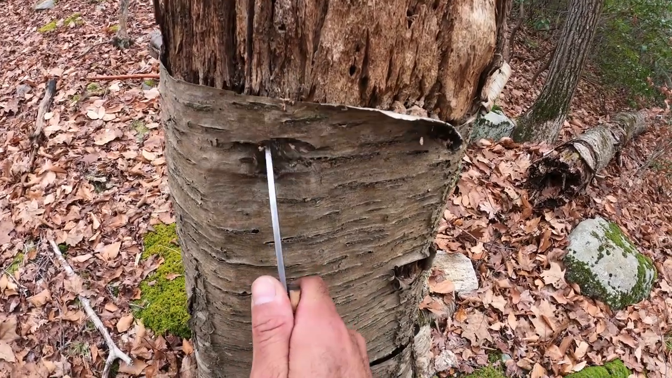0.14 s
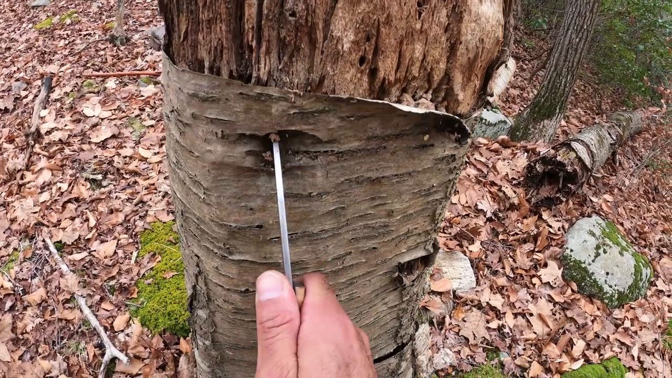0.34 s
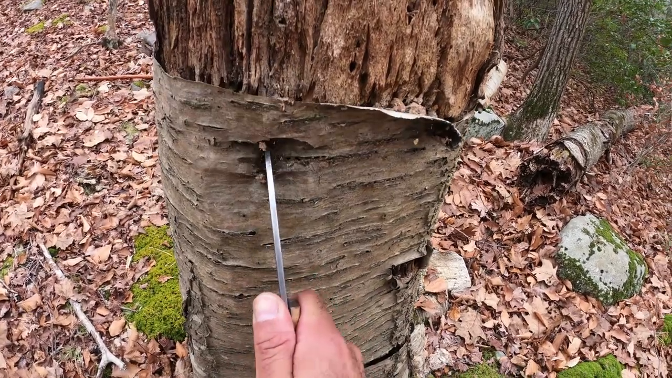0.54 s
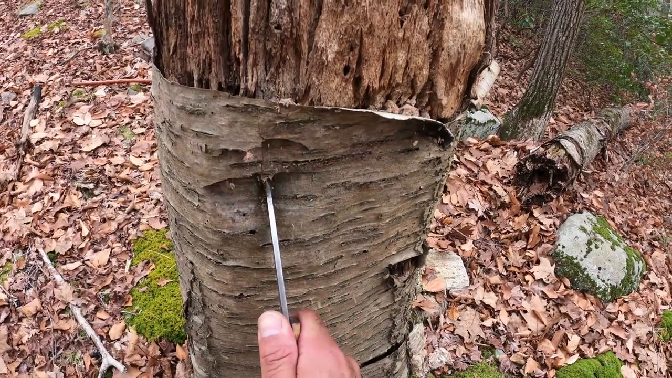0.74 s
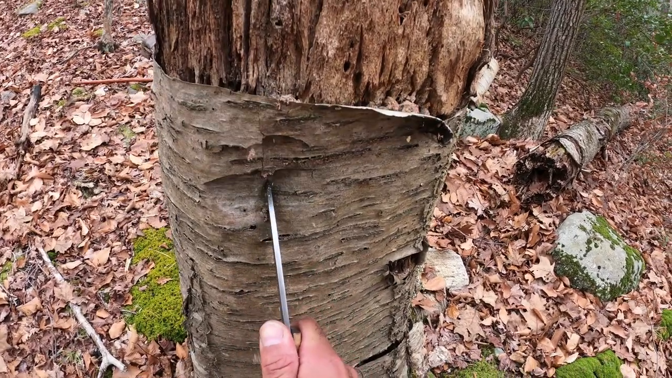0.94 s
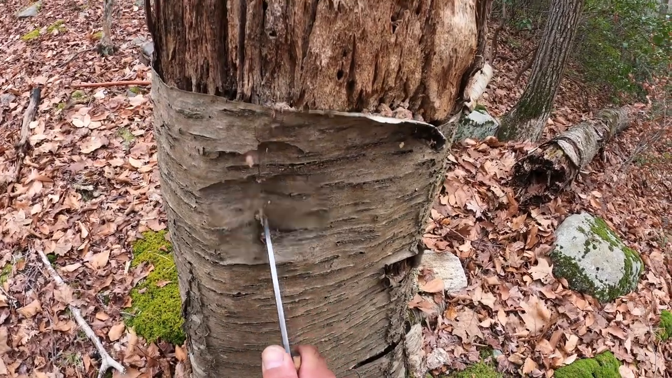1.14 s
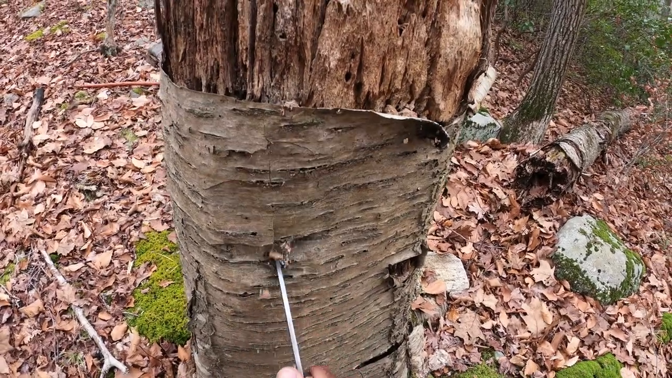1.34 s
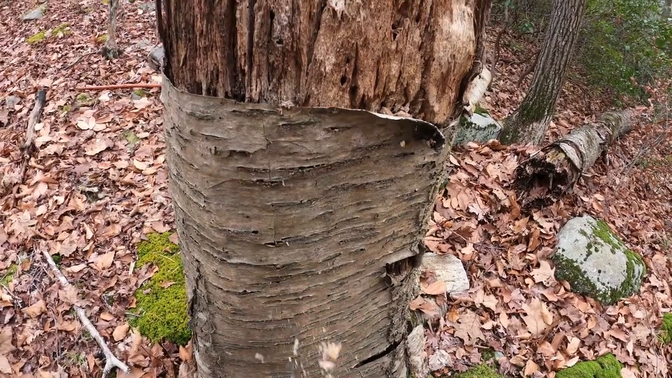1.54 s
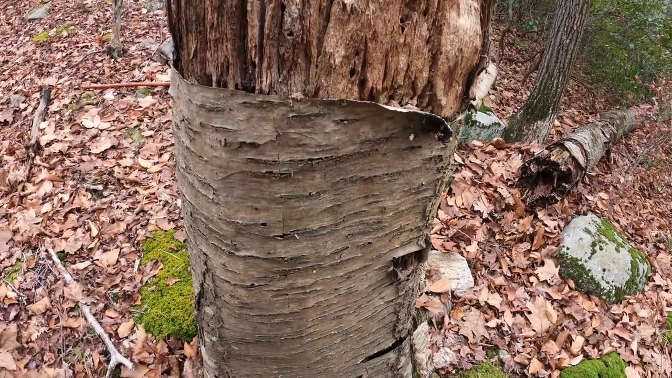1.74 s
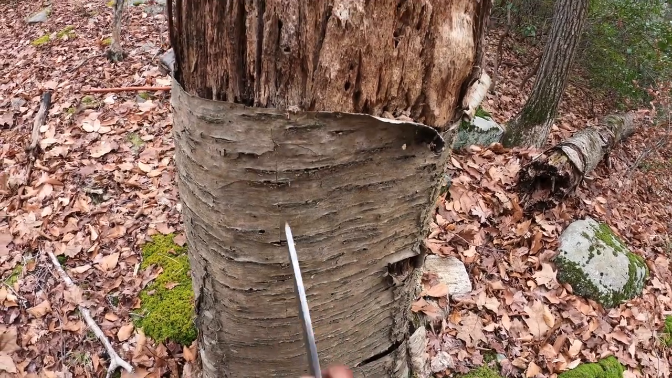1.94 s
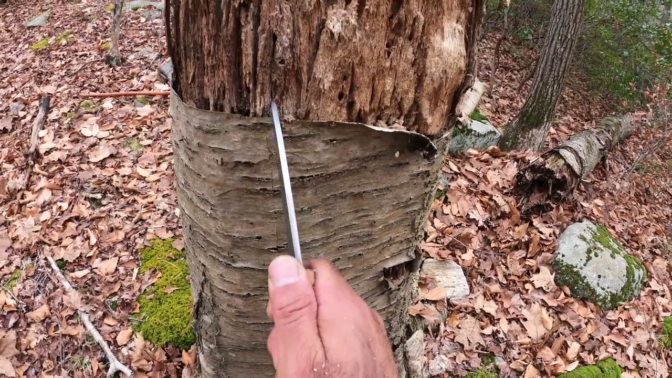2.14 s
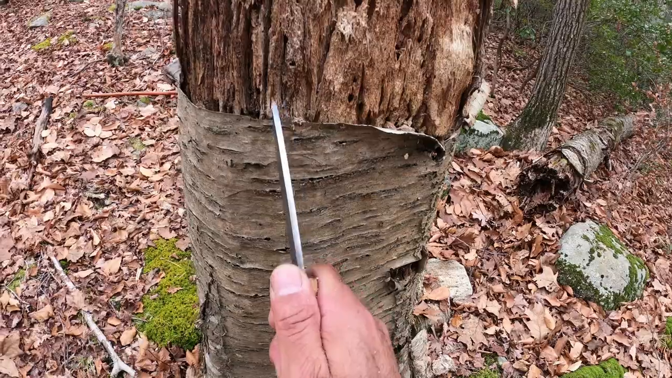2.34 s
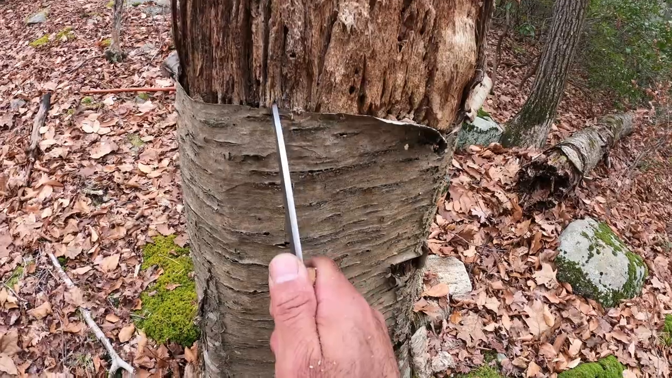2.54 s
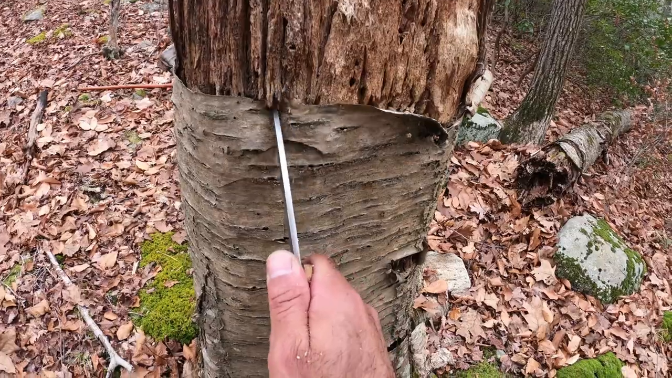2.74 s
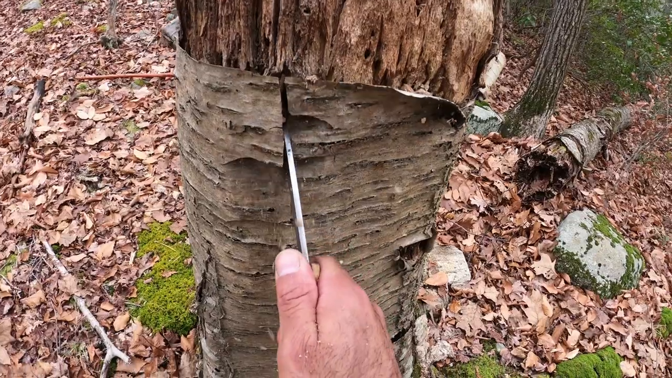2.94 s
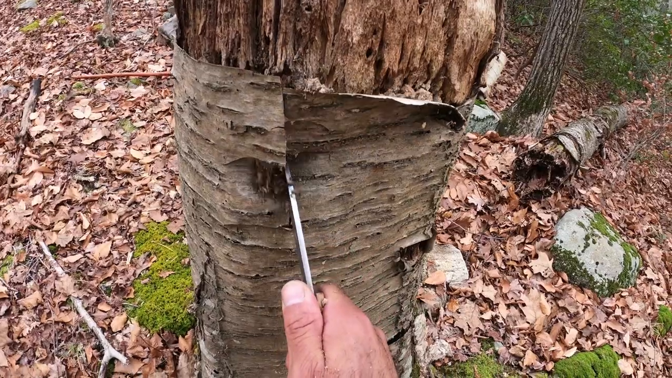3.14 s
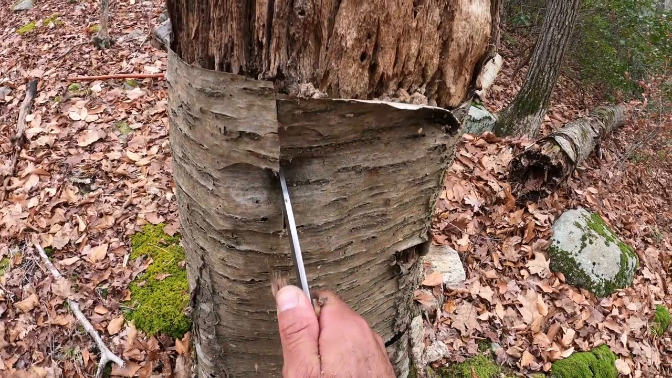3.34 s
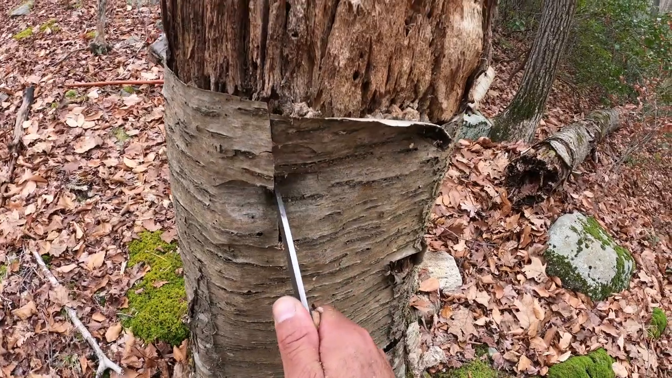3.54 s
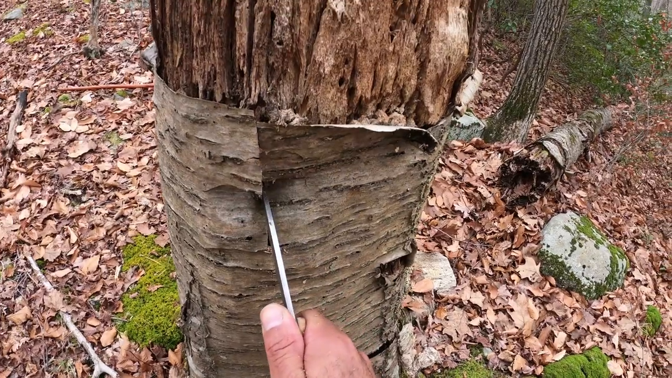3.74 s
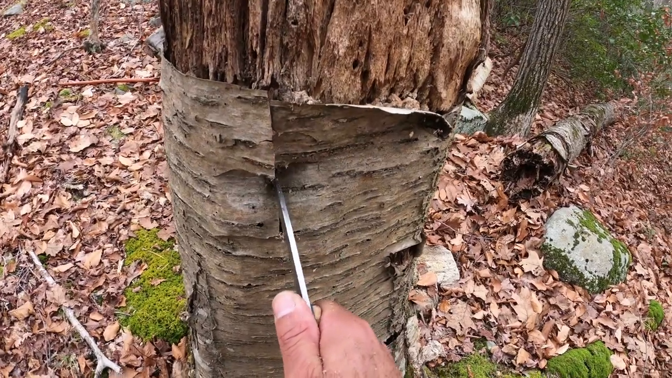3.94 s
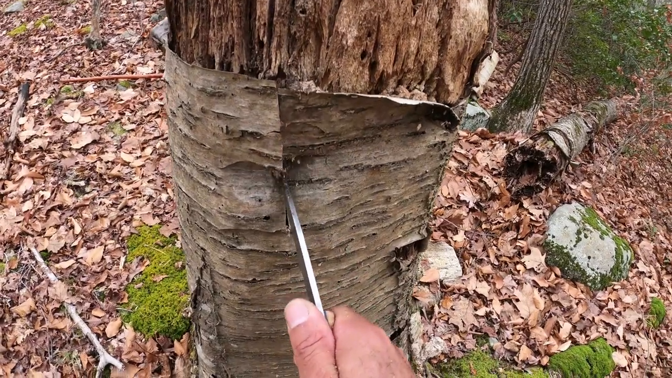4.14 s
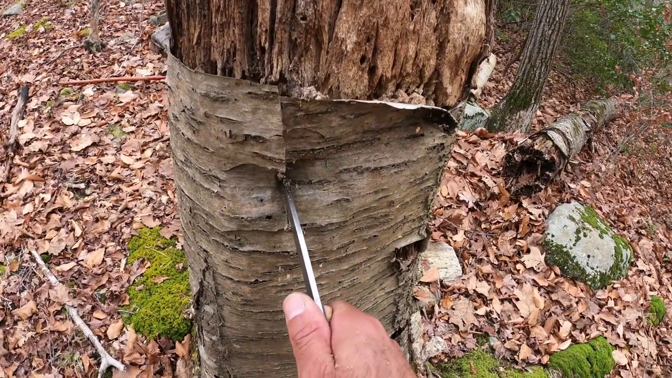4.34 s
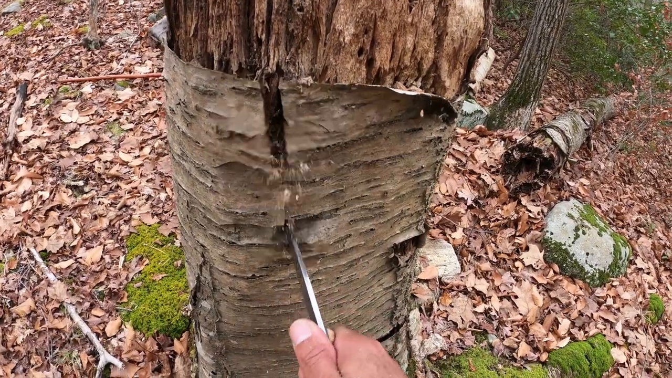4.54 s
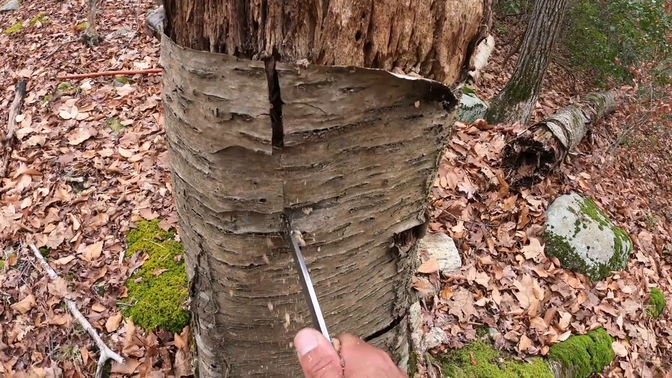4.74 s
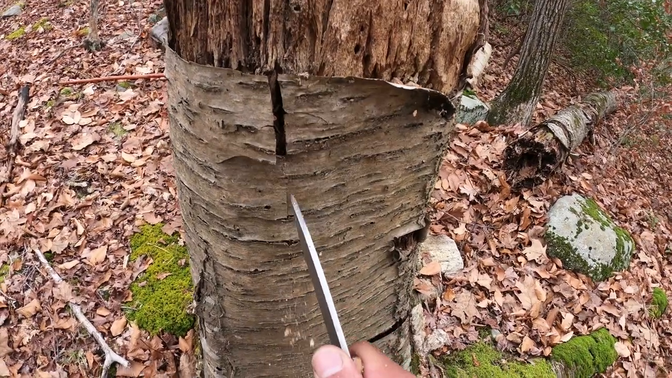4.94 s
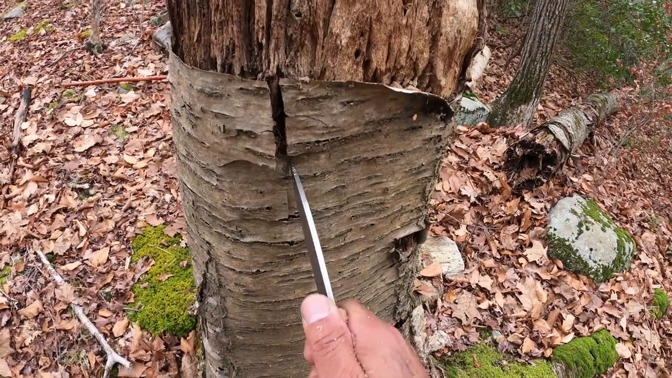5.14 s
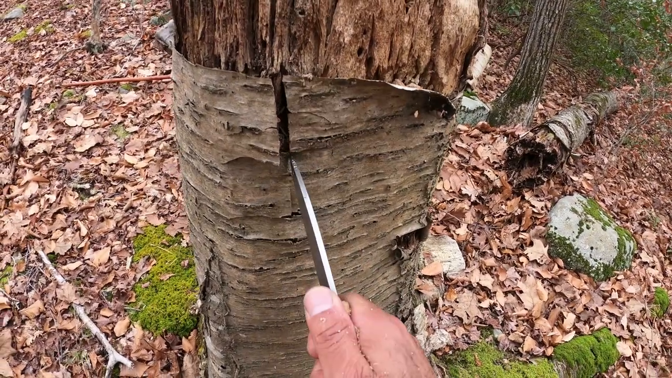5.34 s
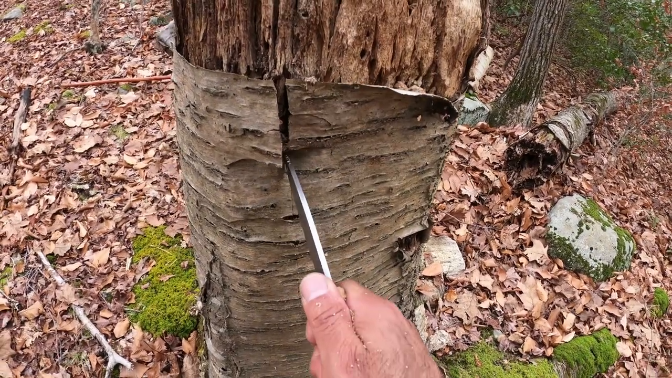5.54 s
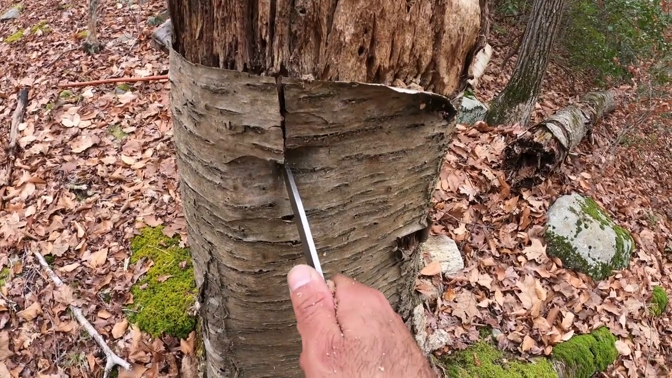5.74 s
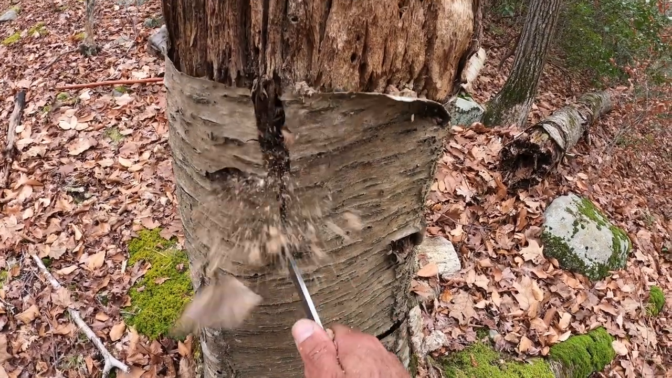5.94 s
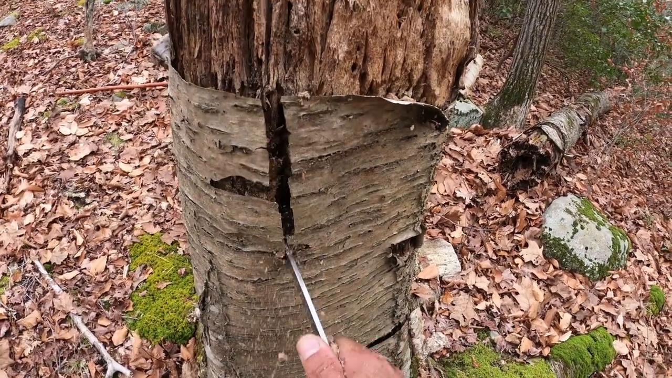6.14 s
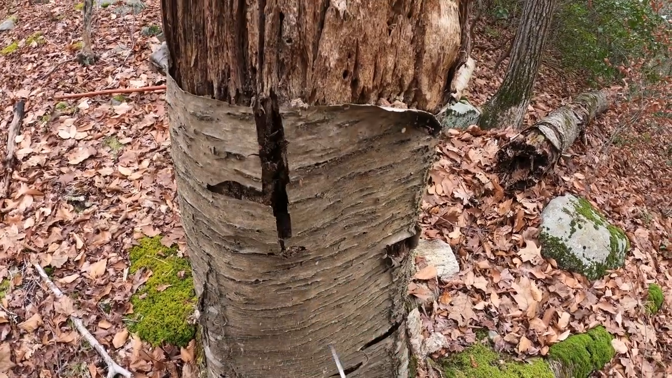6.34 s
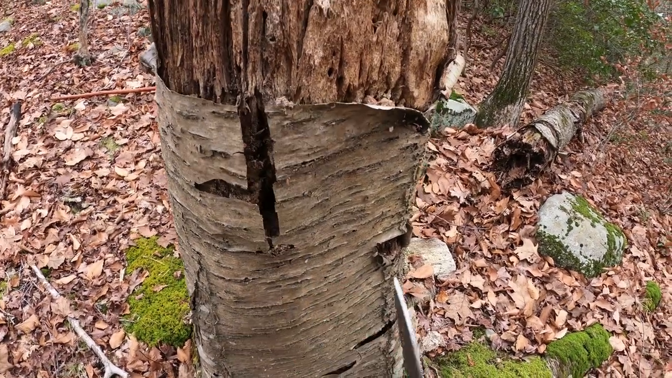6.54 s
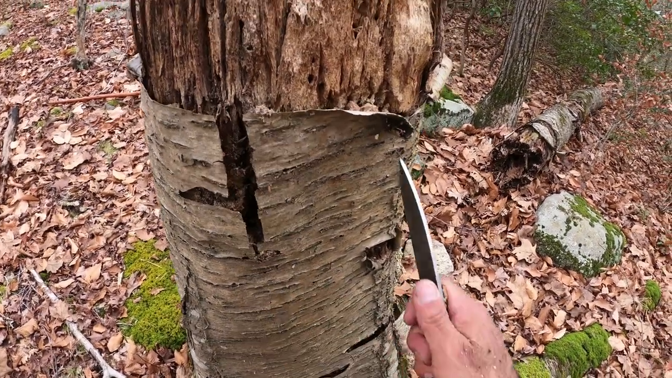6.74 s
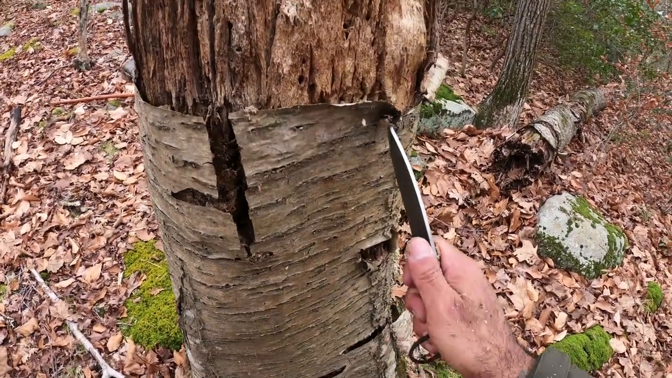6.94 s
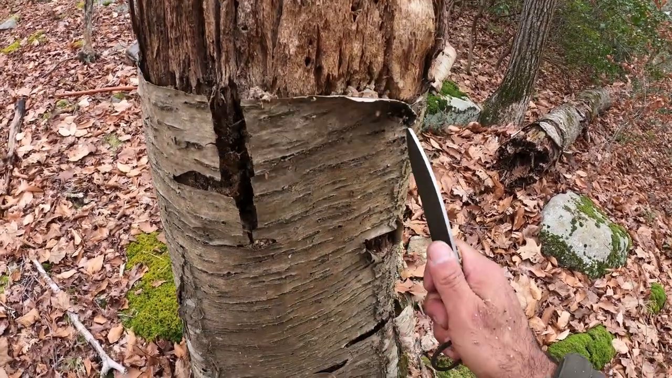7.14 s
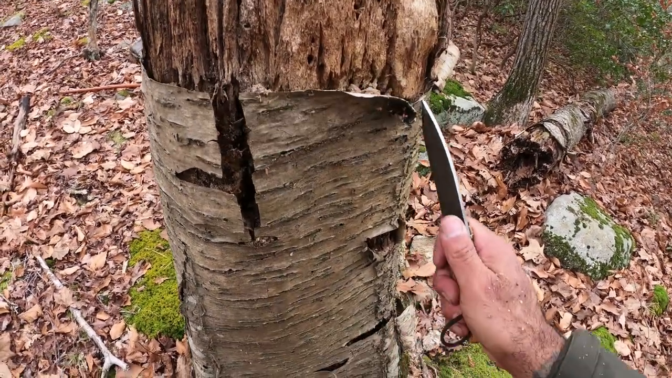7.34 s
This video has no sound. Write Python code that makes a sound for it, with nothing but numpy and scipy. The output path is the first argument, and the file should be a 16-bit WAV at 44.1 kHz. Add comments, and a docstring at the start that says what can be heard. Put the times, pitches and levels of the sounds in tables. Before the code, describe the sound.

Sharp, dry cracks burst out at once, crowding into a crunchy rip of bark, then pause while bits tick onto leaf litter. The cutting resumes with single snaps, faint blade scraping and harder splintering, rests briefly, and ends its last long tear in a dense crackle. Soft wind rumble and bumps underlie it; outdoors, dry, close stereo pickup with the loudest cracks slightly clipped.

```python
"""Knife ripping birch bark

A knife rips down through dry birch bark on a standing trunk, an arm's length from a small camera in a wood.
Short noise bursts ring the bark's modes as snapping plates; dense random clicks ring them as tearing fibres.
Damped sines are the loose sheet thumping on the trunk; clicks and brief scratches are crumbs on dry leaves.
Shaped noise is the wind and jolts rumbling on two microphone ports, over the faint air of the wood."""
import sys
import numpy as np
from scipy import signal
from scipy.fft import rfft, irfft
from scipy.io import wavfile
from scipy.ndimage import uniform_filter1d

SR = 44100
rng = np.random.default_rng(int(sys.argv[2]) if len(sys.argv) > 2 else 0)


def int16_out(signal):
    """Quantize to a 16-bit WAV file."""
    q = np.round(np.clip(np.atleast_2d(signal).T, -1, 1) * 32767)
    wavfile.write(sys.argv[1], SR, q.astype(np.int16))


N = 326340
TIME = np.arange(N) / SR

# Bark plates snapping. Each row: start in seconds, peak level in dB, plate pitch in Hz,
# peak of the brittle treble over that of the plate in dB.
PLATE_SNAPS = [(0.2607, -37, 1460, 4), (0.2657, 3, 1630, 5), (0.2683, -12.5, 1510, 5),
               (0.2752, -14.5, 1170, 5), (0.2886, -13.5, 1400, 2), (0.2994, -16, 1280, 5),
               (0.309, -24.5, 1006, 5.5), (0.674, -16, 1670, -2), (0.685, -8.5, 1620, 0),
               (0.7239, -13.5, 1630, -4), (0.7322, -1.5, 1300, -4), (0.766, -12, 1080, 1),
               (0.804, -3.5, 1540, 2), (0.811, -7, 916, -1), (1.0404, -13.5, 1040, -4.5),
               (1.0592, -12, 1630, 6), (1.084, -8, 1740, -8), (1.209, -30, 1880, 7),
               (1.2286, -21, 1290, -2.5), (1.2322, -13, 970, 1.5), (1.28, -23.5, 1110, -20.5),
               (1.303, -13, 1760, -6.5), (1.327, 1, 1540, -10.5), (1.3325, -2.5, 1520, 2.5),
               (1.367, -19, 1120, -6.5), (1.535, -22, 1740, 19), (1.574, -25, 935, -17),
               (1.5859, -21.5, 1090, -28.5), (1.598, -19, 1300, -2), (1.602, -17.5, 1500, -9),
               (1.6067, -9, 1510, -2), (1.609, -19.5, 1390, -21), (1.618, -3, 1350, 3),
               (1.649, -7, 1010, -18), (1.6524, -12, 1310, 7), (1.6586, -15.5, 1400, 12.5),
               (1.6622, -12, 1700, 23), (1.6649, -16, 1300, 27), (1.67, -12, 1100, -14),
               (1.6778, -8, 1610, 5), (1.6835, -16, 1000, 4), (1.6918, -11, 1300, -33),
               (1.694, -8, 1240, 7.5), (1.698, -8.5, 1300, -18), (1.717, -15, 840, -19.5),
               (2.313, -25, 1470, 8), (2.566, -37.5, 1410, -6), (2.834, -30.5, 1260, -4),
               (2.902, -21.5, 1550, 16.5), (2.929, 1, 1155, -0.5), (2.934, -24, 1500, 26),
               (2.941, -12.5, 1800, 27), (3.116, -26.5, 1370, -1), (3.149, -18, 1470, -5.5),
               (3.202, -14.5, 1520, 5), (3.209, -17, 1290, 11), (3.252, -6.5, 1850, 3),
               (3.516, -27, 1240, -22), (3.543, -23, 1400, 8), (3.602, -10, 1350, -2),
               (3.699, -16.5, 1500, -4.5), (3.7053, -17.5, 1200, 5.5), (3.729, -21, 1410, -8),
               (3.731, -6, 1200, 1.5), (3.975, -27.5, 1530, -1.5), (4.033, -22, 1600, 8),
               (4.128, -12.5, 1510, -39.5), (4.156, -22, 1670, -34), (4.232, -20, 1620, -10.5),
               (4.278, -19.5, 1500, -8), (4.282, -12, 1460, -6.5), (4.2906, -16, 1560, 12),
               (4.339, -7.5, 1480, 11), (4.3436, -1.5, 1210, -15.5), (4.355, -6, 1300, -5),
               (4.61, -19, 1470, -2.5), (4.7056, 0, 1170, -2), (4.7197, -15, 1180, -3),
               (4.727, -19, 1100, -4), (4.812, -20.5, 1000, -10), (4.912, -18.5, 1295, -4),
               (4.915, -13, 1100, -21), (4.922, -5, 1180, -17), (4.965, -18.5, 1200, 2.5),
               (5.022, -13, 1260, -26.5), (5.0406, -6.5, 1180, 2), (5.045, -11.5, 1510, -6.5),
               (5.418, -29.5, 1220, -4.5), (5.8739, -5.5, 1580, 3), (5.874, -6.5, 1240, -2),
               (6.019, -27.5, 1530, -15), (6.031, -6, 1430, -2), (6.034, -5.5, 1410, 12),
               (6.0531, -11, 1530, 1), (6.0572, -13.5, 1490, 4), (6.0604, -9, 1350, 3),
               (6.064, -10, 1310, 3), (6.0676, -10, 1300, 20), (6.0716, -11, 1200, 16),
               (6.077, -18, 1940, 9), (6.081, -6, 1240, 4), (6.084, -10, 1390, 1),
               (6.0932, -11.5, 1400, -21), (6.098, -15.5, 1500, 3), (6.1021, -21, 1400, 5),
               (6.1248, -12, 1260, 4), (6.315, -27, 1455, -5), (6.344, -28.5, 1280, -30),
               (7.062, -25, 1500, -5.5), (7.145, -19, 1300, 17), (7.204, -10.5, 1100, 7.5),
               (7.22, -3.5, 1870, 11), (7.3133, -13, 1190, 18)]
# Modes of the bark: the hollow behind, the plate and the brittle skin; tearing rings them too.
# Each row: frequency in Hz, width of the narrower of two resonators in Hz, level before chance scatter in dB.
HOLLOW_MODES = [(323.7, 141, 7.5), (530, 385, 7)]
PLATE_MODES = [(1039, 49, 0.5), (1162, 330, 4), (1525, 296, 5.5)]
BRITTLE_MODES = [(2140, 1700, -4), (3150, 1380, 8.5), (3990, 600, 0), (5300, 2700, 0.5), (6660, 567, 6.5),
                 (9040, 1600, -7.5), (11250, 3800, -15.5)]
SNAP_DULL = 0.38  # filter pole: a whole plate breaking is duller on top than a single fibre


def snaps():
    """Impulsive modal excitation: a crack of about a millisecond rings plate, brittle skin and hollow."""
    out, t = np.zeros((2, N + 1024)), np.arange(1024) / SR
    shape = (1 - np.exp(-t / .0003)) * (np.exp(-t / .0003) + .02 * np.exp(-t / .004))
    for s, peak_db, hz, brittle_db in PLATE_SNAPS:
        run, *edges = rng.standard_normal((3, len(t))) * shape
        plate = ring(ring(run, hz, 650), hz, 650) + 0.25 * body(run, PLATE_MODES, 8.2, size=1)
        # each port faces other edges
        tail = 0.05 * rng.standard_normal((2, len(t))) * np.exp(-t / 0.0037)
        seen = run + 0.57 * np.array(edges) + tail
        brittle = signal.lfilter([1, 1], [1, -SNAP_DULL], body(seen, BRITTLE_MODES, 4, size=1))
        hollow = body(run, HOLLOW_MODES, 17.0, size=1)
        hollow_db = -18.5 + 0.8 * peak_db  # big cracks reach deeper and shake the hollow more
        levelled = zip((0, brittle_db, hollow_db), (plate, brittle, hollow))
        crack = sum(undb(db) * part / np.abs(part).max() for db, part in levelled)
        start = int(s * SR)
        out[:, start:start + len(t)] += crack / np.abs(crack).max() * undb(peak_db)
    return out[:, :N]


# Rips: fibres part ever faster until the strip gives, then die away.
# Each row: moment of giving in seconds, build-up in seconds, dying in seconds,
# then levels at the giving in dB: plate rasp, brittle crackle, hollow low-mid.
STRIP_RIPS = [(0.109, 0.073, 0.32, -46.5, -47.5, -54.5), (0.28, 0.085, 0.05, -27, -28, -32),
              (.688, 0.056, 0.28, -47, -55.5, -51), (0.817, 0.031, 0.021, -24.5, -28, -24.5),
              (.95, 0.063, 0.76, -51.5, -58.5, -65), (1.084, 0.15, 0.036, -40.5, -50, -51),
              (1.237, 0.079, 0.12, -43, -45.5, -52), (1.335, 0.042, 0.048, -22.5, -30.5, -22),
              (1.617, 0.11, 0.033, -31.5, -31, -40), (1.654, 0.006, 0.079, -17.5, -27, -30),
              (1.703, 0.075, 0.035, -30, -30.5, -20), (2.58, 0.026, 0.13, -54, -62.5, -68.5),
              (2.87, 0.2, 0.11, -49.5, -49.5, -58.5), (2.941, 0.091, 0.067, -28, -33.5, -31.5),
              (3.218, 0.16, 0.063, -35, -40, -31), (3.538, 0.028, 0.21, -49.5, -53, -44.5),
              (3.73, 0.055, 0.1, -42, -43.5, -46.5), (4.02, 0.02, 0.11, -35.5, -39, -47.5),
              (4.132, 0.043, 0.039, -42.5, -55.5, -95), (4.236, 0.0043, 0.067, -33.5, -45, -53),
              (4.29, 0.065, 0.037, -29.5, -40.5, -48), (4.368, 0.081, 0.028, -43, -56.5, -35.5),
              (4.722, 0.11, 0.034, -29.5, -34, -35.5), (4.821, 0.057, 0.043, -40.5, -56.5, -40),
              (4.884, 0.049, 0.067, -35, -41, -41), (4.959, 0.035, 0.041, -48.5, -57.5, -38.5),
              (5.047, 0.13, 0.032, -28.5, -37.5, -38), (5.296, 0.0026, 0.12, -37, -48, -63.5),
              (5.416, 0.13, 0.067, -47.5, -51.5, -63), (5.465, 0.0076, 0.044, -34.5, -45, -47),
              (5.63, 0.12, 0.22, -49, -54, -63.5), (5.694, 0.099, 0.2, -51, -58.5, -66),
              (5.877, 0.022, 0.014, -31, -65, -23), (6.033, 0.012, 0.063, -30.5, -31, -30.5),
              (6.052, 0.0045, 0.099, -15, -23, -22.5), (6.115, 0.09, 0.058, -22.5, -30.5, -27.5),
              (6.346, 0.11, 0.09, -48, -58, -61.5), (7.083, 0.14, 0.075, -50, -51.5, -50.5),
              (7.221, 0.028, 0.023, -30, -29.5, -29.5), (7.319, 0.017, 0.019, -30, -35.5, -33)]
# Blade resting in the cut, faintly ticking.
# Each row: time in seconds, plate rasp in dB, brittle crackle in dB.
BLADE_DRAG = [(0, -73.5, -74), (.5, -67, -64), (.9, -80, -69.5), (1.45, -70.5, -63.5), (1.85, -80, -72.5),
              (2.5, -77, -87), (3.1, -67, -67), (3.35, -60.5, -64), (3.5, -53.5, -50.5), (3.85, -57, -53.5),
              (4.2, -60, -56), (4.6, -61, -70), (5.15, -73, -66.5), (5.9, -66.5, -61), (6.5, -78.5, -63),
              (7.05, -68.5, -64.5), (7.4, -69, -70)]
DRAG_HOLLOW_DB = -15  # relative to the plate rasp
# fibre rate when rasp and crackle together reach -44.5 dB; ten times as many for every BUSIER_DB louder
FIBRES_PER_S, BUSIER_DB = 1300, 40.5
FIBRE_SPREAD_DB, EVENING = 2.5, .14  # the busier the tearing, the more alike the fibres
SCRAPE = 1.0  # even rubbing against single fibres, as a ratio


def tearing():
    """Shot noise through resonators: parting fibres ring the bark; the blade sticks and slips."""
    drag_db, tick_db = curves(BLADE_DRAG)
    shapes = [swell(*rip[:3]) for rip in STRIP_RIPS]

    def strength(rest_db, column):
        """Power addition: the rips' levels in one column join the resting blade's."""
        rips = joined(undb(rip[column]) * shape for rip, shape in zip(STRIP_RIPS, shapes))
        return np.hypot(undb(rest_db), rips)

    rasp = strength(drag_db, 3)
    crackle = strength(tick_db, 4)
    boom = strength(drag_db + DRAG_HOLLOW_DB, 5)

    busy = (np.hypot(rasp, crackle) / undb(-44.5)) ** (20 / BUSIER_DB)
    spread_db = FIBRE_SPREAD_DB / np.maximum(busy, .6) ** EVENING
    fibres = grains(FIBRES_PER_S * busy, spread_db) / np.sqrt(busy)  # denser clicks, like power
    fibres = fibres + 0.23 * rng.standard_normal(N)
    slip_db = 6.5 / np.maximum(busy, 1) ** 0.23  # less stick and slip in a full rip
    skin = fibres * fits(slip_db, size=256)  # the brittle skin chatters on its own
    scrape = SCRAPE / np.maximum(busy, 1) * fibres.std() * rng.standard_normal(N)  # a slow blade rubs evenly
    fibres = (fibres + scrape) * fits(.5 * slip_db, size=640)

    plate = unit(body(fibres, PLATE_MODES, 8.6, size=N))
    hollow = unit(body(fibres, HOLLOW_MODES, 6, size=N))
    brittle = unit(body(skin, BRITTLE_MODES, 9.1, size=(2, N)))
    return rasp * plate + crackle * brittle + boom * hollow


# Loose sheet knocking on the trunk; wind() takes its jolts from the same rows.
# Each row: start in seconds, peak level in dB, pitch in Hz, time to ring down 60 dB in seconds (at least 0.01).
SHEET_THUMPS = [(0.065, -25, 69, 0.2), (0.27, -14.5, 149, 0.055), (0.296, -22.5, 141.4, 0.072),
                (0.767, -28.5, 148, 0.071), (0.804, -25.5, 78, 0.088), (0.821, -28.5, 119, 0.062),
                (1.331, -16, 136, 0.026), (1.619, -29.5, 119, 0.074), (1.653, -29, 229, 0.097),
                (1.68, -29, 105, 0.11), (1.715, -27.5, 181, 0.057), (2.928, -21.5, 132.3, 0.14),
                (2.941, -13, 139, 0.069), (3.22, -27.5, 326, 0.021), (3.529, -35, 148, 0.07),
                (3.573, -28.5, 137, 0.067), (3.616, -32.5, 144, 0.069), (3.633, -31, 157, 0.046),
                (4.371, -25, 125, 0.077), (4.498, -34.5, 133.4, 0.097), (4.707, -13.5, 152, 0.01),
                (4.723, -27.5, 136.7, 0.17), (5.875, -19, 401, 0.033), (5.88, -18.5, 138, 0.074),
                (6.053, -28, 167, 0.082), (6.086, -26.5, 130, 0.13), (7.223, -35.5, 280, 0.027),
                (7.32, -35.5, 125, 0.083)]


def thumps():
    """Damped oscillation: a soft push swings the sheet, with a weaker upper mode and a short knock."""
    out, t = np.zeros(N + 16384), np.arange(16384) / SR
    for s, peak_db, hz, ring_s in SHEET_THUMPS:
        fade = np.exp(-np.log(1000) * t / max(ring_s, .01)) * (1 - np.exp(-t / 0.003))
        upper = 0.39 * np.sin(2 * np.pi * 1.4 * hz * t)
        knock = 0.54 * np.exp(-t / .005) * np.sin(2 * np.pi * 2.26 * hz * t)
        swing = fade * (np.sin(2 * np.pi * hz * t) + upper + knock)
        start = int(s * SR)
        out[start:start + len(t)] += undb(peak_db) * swing / np.abs(swing).max()
    return out[:N]


# Sound wraps round the housing.
# Each row: frequency in Hz, phase by which left leads in radians, left minus right in dB.
PORT_DIFFERENCES = [(0, 0, -1), (1000, -.3, -1), (1600, -1, 1), (2300, -2.6, -4), (2900, -5.9, 0),
                    (3500, -6.7, -3.5), (5800, -7.1, -5), (6400, -6.4, 0), (7000, -7.6, 4),
                    (7600, -8.6, -3), (8400, -12.2, -5), (9500, -13.3, 0), (10800, -14.8, 0),
                    (16000, -14.3, -4)]


def ports(sound):
    """Diffraction: each port hears the bark with its own delay and shading, set by frequency."""
    hz, radians, pan_db = np.transpose(PORT_DIFFERENCES)
    bins = np.arange(N // 2 + 1) * SR / N
    side = np.array([[.5], [-.5]])  # half the difference to each port
    turn = np.exp(1j * side * np.interp(bins, hz, radians))
    shade = undb(side * np.interp(bins, hz, pan_db))
    return irfft(rfft(sound) * turn * shade, N)


# Single crumbs landing on the leaves.
# Each row: start in seconds, peak of the leaf's ring in dB, leaf pitch in Hz.
CRUMB_LANDINGS = [(1.805, -38.5, 6270), (1.9734, -40.5, 1850), (1.9802, -31, 1650), (2.011, -33, 2200),
                  (2.115, -35.5, 2080), (2.171, -40, 1770), (2.193, -37.5, 4510), (2.217, -42.5, 3560),
                  (2.242, -43, 5580), (2.376, -37.5, 5160), (6.44, -34, 6470), (6.451, -38.5, 1900),
                  (6.574, -45, 1650), (6.596, -34.5, 4620), (6.6142, -30.5, 6010), (6.64, -30.5, 3030),
                  (6.695, -38, 5460), (6.9277, -43, 2970), (6.991, -33, 4300), (7.0446, -32, 2000),
                  (7.0832, -36, 1570)]
# fade time constant in seconds, sharpness of the leaf's ring, wide crackle's peak relative to the ring's
CRUMB_S, CRUMB_Q, CRUMB_BROAD_DB = 0.0026, 5.8, -3


def crumbs():
    """Impact resonance: a short scratch rings the leaf it hits, a little differently at each port."""
    out, t = np.zeros((2, N + 1024)), np.arange(1024) / SR
    for s, peak_db, hz in CRUMB_LANDINGS:
        both, *own = rng.standard_normal((3, len(t))) * np.exp(-t / CRUMB_S)
        scratch = both + 0.95 * np.array(own)
        leaf, broad = ring(scratch, hz, hz / CRUMB_Q), ring(scratch, 3200, 2300)
        tick = leaf / np.abs(leaf).max() + undb(CRUMB_BROAD_DB) * broad / np.abs(broad).max()
        start = int(s * SR)
        out[:, start:start + len(t)] += tick * undb(peak_db)
    return out[:, :N]


# Crumbs pattering on dry leaves below. Each row: time in seconds, level before chance wavering in dB.
RUSTLE_LEVEL = [(0, -106), (1.75, -65), (1.95, -57.5), (2.3, -59), (2.5, -72), (6.3, -72), (6.55, -56.5),
                (6.64, -51.5), (6.655, -31), (6.7, -46.5), (7.0, -53), (7.4, -66.5)]
# Colouring filter of the rustle. Each row: frequency in Hz, relative gain in dB.
LEAF_COLOUR = [(500, -32.5), (1000, -23.5), (1800, -10), (3300, -15), (6000, -15.5), (10000, -26),
               (16000, -49)]


def rustle():
    """Granular noise: tiny leaf clicks, ringing by chance in bands, over a patchy hiss of each port's own."""
    bands = [(hz, hz / 5, 0) for hz in 1000 * 2 ** np.arange(0, 4, .5)]
    clicks = unit(body(grains(900, 2.6), bands, 6.5, size=N))
    sides = [colour(clicks + 1.4 * rng.standard_normal(N), LEAF_COLOUR) for _ in range(2)]
    return undb(curves(RUSTLE_LEVEL)[0]) * fits(2.0, size=512) * np.array(sides)


# Wind on the ports. Each row: time in seconds, level before port balance and wavering in dB.
WIND_LEVEL = [(0, -43.5), (.25, -37), (.45, -56), (1.1, -68), (1.6, -52), (2, -70), (2.7, -67), (3.6, -69),
              (4.3, -56), (4.65, -53.5), (4.8, -41), (5.3, -79), (5.48, -50.5), (5.6, -79.5), (6.15, -41),
              (6.35, -71), (7.4, -63)]
# Spectra of the rumble and of the air of the wood. Each row: frequency in Hz, relative level in dB.
GUST_COLOUR = [(20, 3.5), (45, -2.5), (90, -5.5), (180, -12.5), (400, -42), (2000, -69.5)]
AIR_COLOUR = [(60, -3), (200, -2.5), (500, -20.5), (1560, -23.5), (2400, -18.5), (6300, -26), (16000, -48)]
AIR_DB = -63  # before wavering
# each knock shakes the camera: rumble relative to the knock's peak, its delay, rise and fall
JOLT_DB, JOLT_LATE_S, JOLT_RISE_S, JOLT_FALL_S = -19, 0.03, 0.05, 0.16


def wind():
    """Partly coherent noise: rumble and faint air share a part between the ports, and both waver."""
    shared = rng.standard_normal(N)
    rumble = np.array([colour(.4 * shared + rng.standard_normal(N), GUST_COLOUR) for _ in range(2)])
    air = np.array([colour(.6 * shared + rng.standard_normal(N), AIR_COLOUR) for _ in range(2)])
    jolts = joined(undb(db + JOLT_DB) * swell(s + JOLT_LATE_S, JOLT_RISE_S, JOLT_FALL_S)
                   for s, db, *_ in SHEET_THUMPS)
    strength = np.hypot(undb(curves(WIND_LEVEL)[0]), jolts)
    balance = undb([[-1.2], [1.2]])  # left, right
    gusts = strength * balance * rumble * fits(3.96, size=2048)
    return gusts + undb(AIR_DB) * fits(5.0, size=4096) * air


def body(kick, modes, scatter_db, size):
    """Modal superposition: kicks ring each mode by a chance amount, drawn once (size 1) or per sample."""
    total = 0
    for hz, width_hz, db in modes:
        scattered = kick * undb(scatter_db * rng.standard_normal(size))
        total = total + undb(db) * ring(ring(scattered, hz, width_hz), hz, 4.83 * width_hz)
    return total


def ring(x, hz, width_hz):
    """Resonance: one damped mode, the wider the sooner it dies."""
    r = np.exp(-np.pi * width_hz / SR)
    return signal.lfilter([1 - r, 0, r - 1], [1, -2 * r * np.cos(2 * np.pi * hz / SR), r * r], x)


def grains(per_s, spread_db):
    """Random arrivals: sparse clicks of either sign, many small and a few large."""
    chance = rng.random((3, N))
    size = np.minimum(-np.log(chance[2] + 1e-9), 3.5)
    return (chance[0] < per_s / SR) * np.sign(chance[1] - .5) * undb(spread_db * size)


RIP_RANGE_DB = 30  # a swell climbs this far in its rise and drops as far in its fall
DYING_CURVE = 1.09  # above 1 the drop in dB steepens as it goes


def swell(s, rise_s, fall_s):
    """Exponential growth: gain climbs evenly in dB to 1 at s, then drops away ever faster."""
    late = TIME[::64] - s
    dying = (np.maximum(late, 0) / max(fall_s, .005)) ** DYING_CURVE
    return undb(-RIP_RANGE_DB * np.maximum(dying, -late / max(rise_s, .003)))


def joined(gains):
    """Incoherent addition: swells add in power."""
    return np.interp(TIME, TIME[::64], np.sqrt(sum(g ** 2 for g in gains)))


def fits(depth_db, size):
    """Random modulation: gain moves by smoothed steps to a new chance level every size samples."""
    steps = np.repeat(rng.standard_normal(N // size + 1), size)[:N]
    return undb(depth_db * uniform_filter1d(steps, size // 4))


def colour(x, table):
    """Spectral shaping: filter a signal through (Hz, dB) points, then set its rms to 1."""
    hz, db = np.transpose(table)
    bins = np.maximum(np.arange(N // 2 + 1) * SR / N, 1)
    gain = undb(np.interp(np.log(bins), np.log(hz), db))
    return unit(irfft(rfft(x) * gain, N))


def curves(table):
    """Linear interpolation: columns of a table joined by straight lines in time."""
    s, *columns = np.transpose(table)
    return [np.interp(TIME, s, c) for c in columns]


def undb(db):
    """Decibel law: amplitude ratio for a level."""
    return 10 ** (np.asarray(db) / 20)


def unit(x):
    """Power normalisation: rms 1."""
    return x / np.sqrt(np.mean(x ** 2))


def scene():
    """Superposition: bark sounds pass round the housing; leaves and wind reach each port directly."""
    return ports(snaps() + tearing() + thumps()) + rustle() + crumbs() + wind()


TOP_HZ = 16200


def record(dry):
    """Amplitude and band limiting: the camera clips the loudest peaks and cuts the top."""
    soft = signal.sosfilt(signal.butter(2, 14500, fs=SR, output="sos"), np.clip(dry, -1, 1))
    return signal.sosfilt(signal.ellip(10, .2, 90, TOP_HZ, fs=SR, output="sos"), soft)


dry = scene()
out = record(dry)
int16_out(out)
```